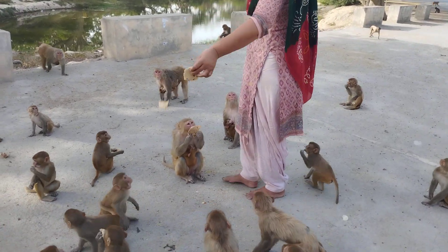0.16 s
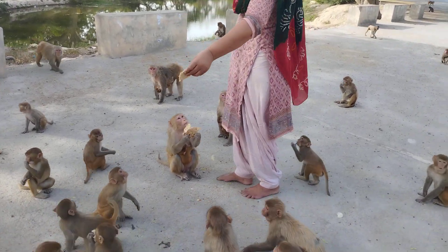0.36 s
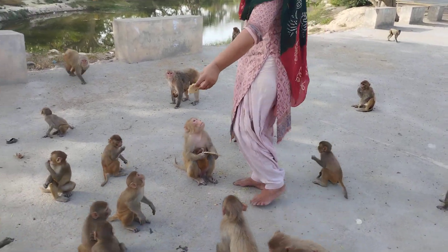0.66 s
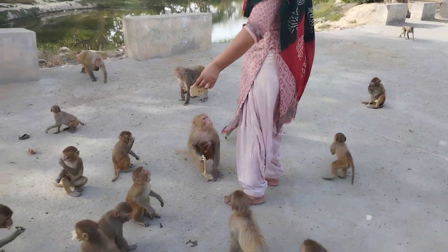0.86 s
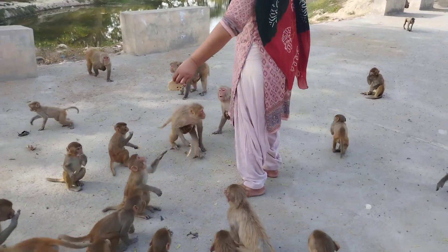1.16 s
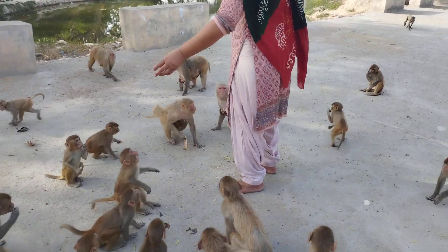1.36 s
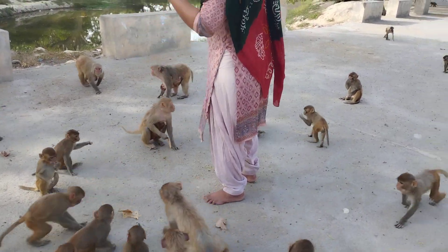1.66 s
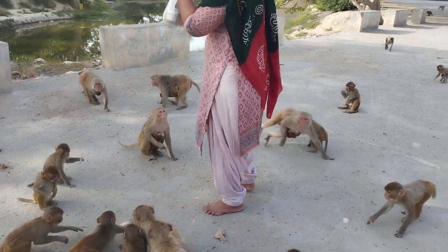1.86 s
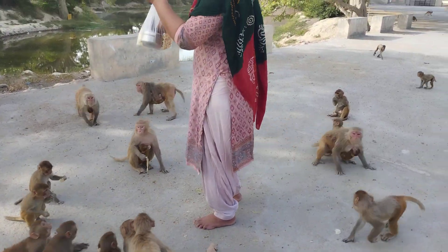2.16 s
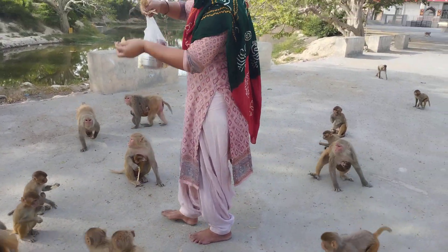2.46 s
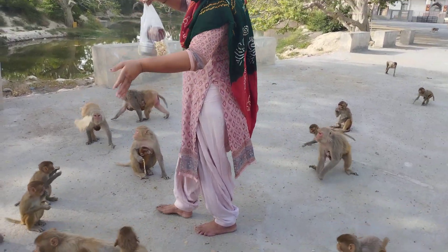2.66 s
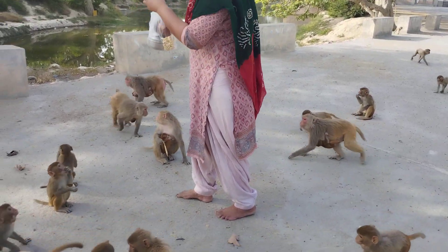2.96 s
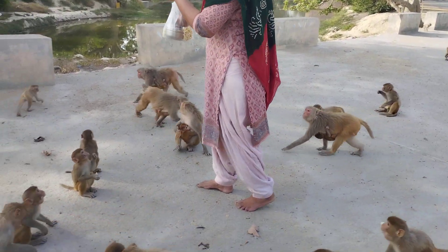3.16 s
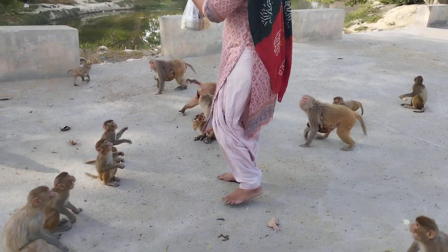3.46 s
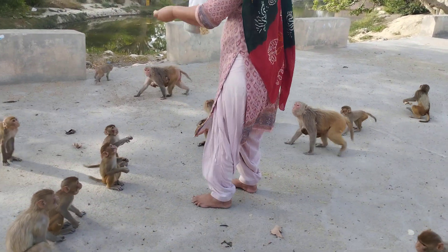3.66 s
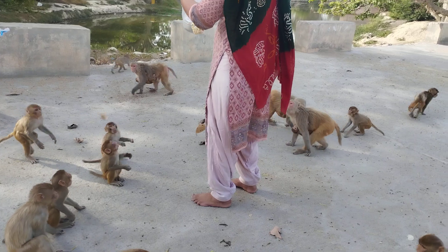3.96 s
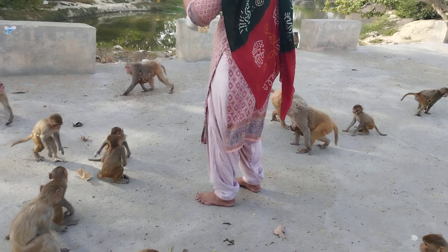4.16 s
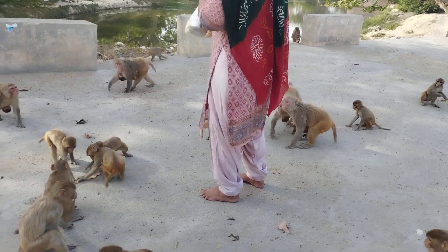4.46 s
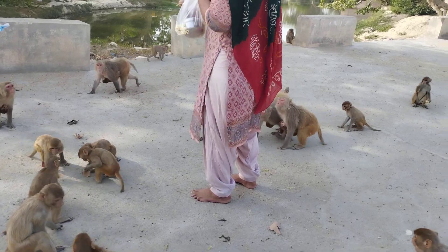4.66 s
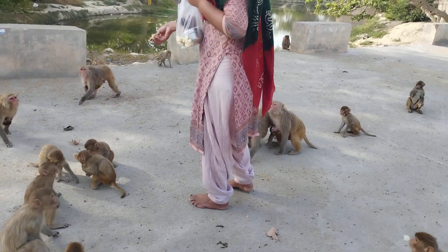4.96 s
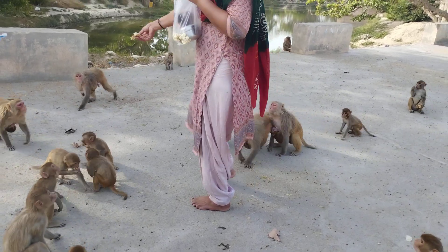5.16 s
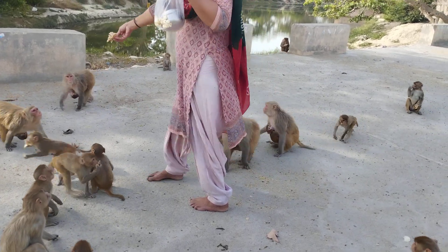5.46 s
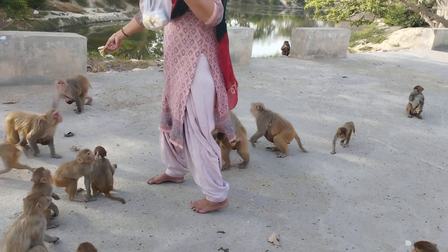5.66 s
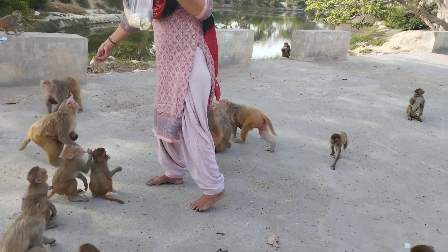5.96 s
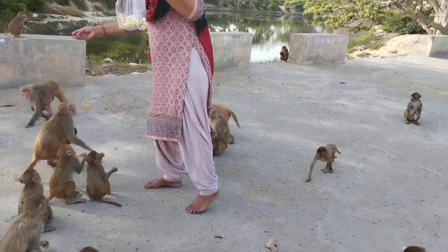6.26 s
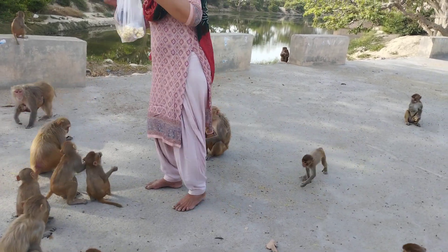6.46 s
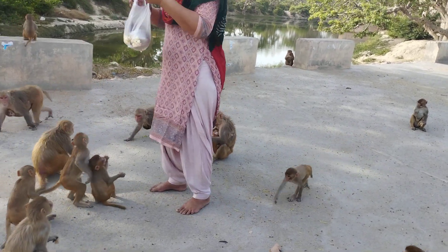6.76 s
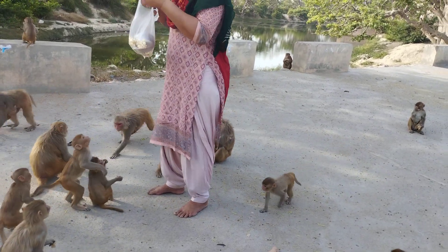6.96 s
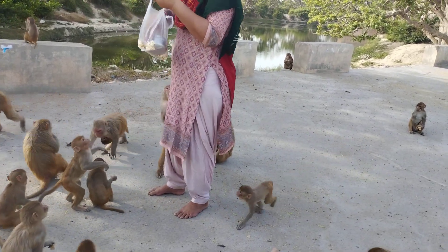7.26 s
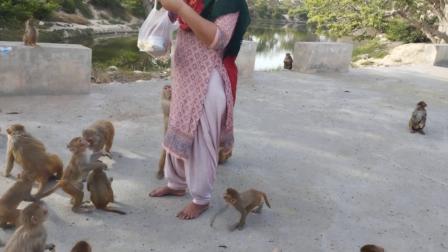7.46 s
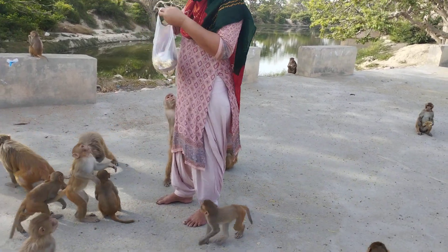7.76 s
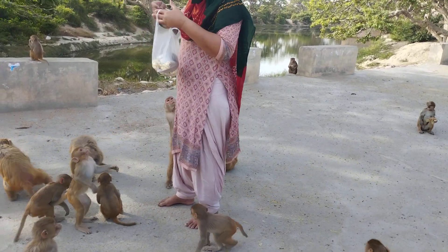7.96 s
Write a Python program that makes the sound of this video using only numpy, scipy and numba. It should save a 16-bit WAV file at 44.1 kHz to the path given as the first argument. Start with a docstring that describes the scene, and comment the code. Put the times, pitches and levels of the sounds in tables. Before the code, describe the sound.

Macaques coo softly and break into shrill, raspy squeals on an open yard while a thin plastic bag crackles close by.

```python
"""Macaques at feeding time

Macaques gather on a concrete yard by a pond to be fed: they coo on gliding stacks of harmonics and break
into shrill squeals roughened by bands of noise. A thin plastic bag crackles close by as filtered creases and
ringing snaps, lips and paws pop on short falling tones, and feet and bodies land as dull low thuds.
Far traffic, made of flickering noise bands, and one engine tone rumble under the open-air hiss."""
import sys
import numpy as np
from scipy import signal
from scipy.fft import rfft, irfft
from scipy.io import wavfile
from scipy.ndimage import uniform_filter1d
from numba import njit

SR = 44100
rng = np.random.default_rng(int(sys.argv[2]) if len(sys.argv) > 2 else 0)


def transcribe(u):
    """Save the signal u as a 16-bit wav file named by the first command-line argument.

    u: samples, shape (n,) or (channels, n), limited to [-1, 1]; the rate is SR.
    q: integer samples, one column per channel.
    """
    v = np.clip(np.atleast_2d(u).T, -1, 1)
    q = np.round(v * 32767).astype(np.int16)
    wavfile.write(sys.argv[1], SR, q)


N = 357210  # length in samples
TOP_HZ = 15900  # upper limit of the voices and of the whole mix


def undb(db):
    """Turn decibels into an amplitude factor."""
    return 10 ** (np.asarray(db) / 20)


def unit(x):
    """Scale to an RMS of 1."""
    return x / np.sqrt(np.mean(x ** 2))


def shape(table, hz):
    """Read the dB of a (Hz, dB) table on a log-frequency axis."""
    table_hz, db = np.transpose(table)
    return np.interp(np.log(np.maximum(hz, 1)), np.log(table_hz), db)


def colour(x, table):
    """Filter by a (Hz, dB) table."""
    gain = undb(shape(table, np.fft.rfftfreq(len(x), 1 / SR)))
    return irfft(rfft(x) * gain, len(x))


@njit
def svf(x, hz, q):
    """State-variable band-pass with a moving centre, gain 1 there."""
    y, band, low, damping = np.empty(len(x)), 0., 0., 1 / q
    for i in range(len(x)):
        g = np.tan(np.pi * hz[i] / SR)
        v = (band + g * (x[i] - low)) / (1 + g * (g + damping))
        band, low, y[i] = 2 * v - band, low + 2 * g * v, damping * v
    return y


def walk(n, rate):
    """Random levels held 1 / rate s and slewed twice; spread near 1."""
    hold = max(int(SR / rate), 1)
    steps = np.repeat(rng.standard_normal(n // hold + 1), hold)
    return 1.482 * uniform_filter1d(uniform_filter1d(steps, hold), hold)[:n]


def add(track, s, x):
    """Mix x into the track from time s."""
    i = int(s * SR)
    track[i:i + len(x)] += x[:N - i]


def envelope(table):
    """Follow a (s, dB) table as an amplitude over the whole scene."""
    return undb(np.interp(np.arange(N) / SR, *np.transpose(table)))


def bands(table, low_hz, octaves, flicker_db):
    """Half-octave bands of noise, each flickering alone, sum to an RMS of 1."""
    out = 0
    for hz in low_hz * 2 ** np.arange(0, octaves, .5):
        centre = np.full(N, hz)
        band = svf(svf(rng.standard_normal(N), centre, 2.56), centre, 2.56)
        out = out + band * undb(shape(table, hz) + flicker_db * walk(N, 9))
    return unit(out)


# Spectrum of the open-air hiss. Each row: frequency in Hz, relative density in dB per Hz.
AIR_SPECTRUM = [(300, -18), (700, -13), (1000, -20), (1800, -14), (3000, -29), (5000, -20.5), (8800, -20),
                (14800, -37), (16000, -37)]


def air():
    """Open-air hiss is broad noise whose bands flicker one by one."""
    return bands(AIR_SPECTRUM, low_hz=320, octaves=5.6, flicker_db=1.5) * undb(-61)


# Spectrum of the far traffic. Each row: frequency in Hz, relative density in dB per Hz.
TRAFFIC_SPECTRUM = [(12, -30), (20, 4.5), (64, 1), (100, -6), (145, -14), (209, -11), (330, -23.5),
                    (600, -38.5), (780, -52), (1320, -120)]
# Swell of the far traffic. Each row: time in seconds, level in dB.
TRAFFIC_LEVEL = [(0.0, -50), (3.2, -52), (3.9, -53.5), (5.0, -52), (6.31, -49.5), (6.56, -53.5), (8.1, -53)]


def traffic():
    """Distance leaves only the low rumble of the road."""
    return bands(TRAFFIC_SPECTRUM, low_hz=24, octaves=4.6, flicker_db=1.5) * envelope(TRAFFIC_LEVEL)


# A far engine pulling away. Each row: time in seconds, firing rate in Hz, level in dB.
ENGINE_PULL = [(1.1, 70.9, -61), (1.4, 73.1, -57), (1.8, 81.5, -55), (2.13, 88.7, -58.5), (2.6, 87, -56.5),
               (2.8, 85, -68)]


def engine():
    """The firing rate is heard as one low tone that wanders in pitch."""
    t = np.arange(N) / SR
    s, firing_hz, db = np.transpose(ENGINE_PULL)
    hz = np.interp(t, s, firing_hz) * (1 + .05 * walk(N, 24.8))
    level = undb(np.interp(t, s, db, left=-120, right=-120))
    return np.sqrt(2) * level * np.sin(2 * np.pi * np.cumsum(hz) / SR)


# Bare feet and bodies landing. Each row: start in seconds, level in dB, pitch in Hz.
LANDINGS = [(0.039, -39.5, 143), (1.51, -46, 271), (2.519, -39, 205), (2.549, -42.5, 274),
            (2.807, -48, 164), (3.439, -47, 256), (3.489, -52, 218), (3.59, -49.5, 232), (5.355, -51, 275)]


def thuds():
    """A soft push into the ground: a few dull cycles."""
    out, t = np.zeros(N), np.arange(4000) / SR
    push = t / 0.011 * np.exp(1 - t / 0.0078)
    for s, db, hz in LANDINGS:
        add(out, s, undb(db) * np.sin(2 * np.pi * hz * t) * push)
    return out


# Lip smacks and paw pats. Each row: start in seconds, level in dB, nominal pitch in Hz.
LIPS_AND_PAWS = [(0.385, -20.5, 854), (0.411, -44, 783), (0.497, -39, 1480), (0.56, -29.5, 880),
                 (0.58, -31.5, 960), (1.279, -33.5, 1690), (1.78, -40, 1600), (2.393, -31, 1875),
                 (2.646, -33, 1540), (2.659, -38, 883), (3.378, -37, 1100), (3.442, -37.5, 1600),
                 (3.504, -41, 1030), (3.713, -46, 1770), (3.837, -44, 1830), (4.019, -39.5, 1180),
                 (4.164, -37, 2260), (5.494, -40, 1710), (5.618, -43, 920), (6.616, -34.5, 1140),
                 (7.755, -39, 1940), (7.765, -31.5, 1960)]


def pops():
    """A small cavity drops in pitch as it opens: a few cycles that slide down and die."""
    out, t = np.zeros(N), np.arange(900) / SR
    slide = 0.863 + 0.93 * np.exp(-t / 0.00066)  # multiples of the nominal pitch
    fade = np.exp(-t / 0.0022) * np.minimum(t / 0.000047, 1)
    for s, db, hz in LIPS_AND_PAWS:
        add(out, s, undb(db) * np.sin(2 * np.pi * np.cumsum(hz * slide) / SR) * fade)
    return out


# Single creases and short scuffs. Each row: start in seconds, level in dB, centre in Hz,
# nominal length in ms (three times the rise).
CREASE_SNAPS = [(0.2256, -22.5, 8550, 13), (0.3826, -17, 8760, 3.4), (1.723, -21, 8350, 6.3),
                (1.8805, -19, 5260, 1.8), (1.8996, -16, 5330, 2.4), (1.9217, -19.5, 8600, 2.3),
                (2.395, -23.5, 8020, 3.0), (2.6329, -26, 10500, 2.7), (2.657, -20, 8000, 3.6),
                (2.826, -26, 8800, 4), (2.8704, -20, 10100, 5.7), (3.004, -17.5, 7500, 5.3),
                (3.2405, -24.5, 8800, 3.4), (3.2965, -32.5, 7560, 3.6), (3.441, -30, 8500, 3.2),
                (3.5882, -17.5, 7450, 5.9), (3.687, -15, 9600, 15), (3.7, -19, 13500, 7.9),
                (3.858, -27, 9100, 2.4), (4.0467, -28.5, 8900, 5.1), (4.147, -30, 11000, 3.0),
                (4.166, -13, 7650, 3.0), (4.181, -29, 3800, 3.5), (4.2236, -26, 10600, 5.7),
                (4.2734, -25, 6100, 6.1), (4.464, -37, 7500, 2.9), (4.726, -27, 10500, 2.8),
                (4.806, -28, 8130, 4.6), (5.027, -28, 7450, 3.3), (5.0615, -25.5, 9050, 2.5),
                (5.3842, -30.5, 7700, 4.1), (5.799, -25, 5000, 8.5), (6.2743, -24, 10000, 3.3),
                (6.5156, -27, 6840, 3.0), (6.5273, -23, 8200, 5.3), (6.6169, -23, 8600, 2.6),
                (6.6485, -18.5, 6860, 6.1), (6.6859, -29, 6900, 3.0), (6.8663, -20.5, 7330, 4.6),
                (7.1415, -29, 11400, 5), (7.154, -29, 11500, 3.0), (7.2913, -21, 7140, 8.8),
                (7.3174, -19, 10500, 4.8), (7.677, -18.5, 7200, 3.9), (7.7505, -18, 4650, 3.0),
                (7.77, -10, 7400, 4.2), (7.7815, -17, 7400, 3.1), (7.9348, -24, 8860, 3.6)]


def snaps():
    """A crease lets go at once: a clean ring, then grit that swells and dies round the same centre."""
    out, t = np.zeros(N), np.arange(2600) / SR
    for s, db, hz, ms in CREASE_SNAPS:
        grit = rng.standard_normal(len(t))
        u = t / (max(ms, .2) / 3000)
        ring = svf(grit, np.full(len(t), 1. * hz), 3.4) + 0.098 * np.diff(grit, prepend=0)
        crack = np.sin(2 * np.pi * hz * t) * np.exp(-t / .0005)
        add(out, s, undb(db) * (0.18 * unit(ring) * u * np.exp(1 - u) + .5 * crack))
    return out


# Steady rustle of the bag. Each row: time in seconds, level in dB.
BAG_RUSTLE = [(0.0, -37.5), (0.34, -51.5), (1.0, -46.5), (1.5, -47.5), (1.72, -48), (2.0, -50),
              (2.7, -52.5), (3.0, -51.5), (3.3, -50), (3.95, -55), (4.2, -46.5), (4.65, -49), (5.25, -57),
              (5.6, -50.5), (6.1, -40.5), (6.28, -56), (6.85, -41.5), (7.14, -57.5), (7.4, -47), (7.9, -60),
              (8.1, -51)]
# Single crumples of the bag. Each row: loudest moment in seconds, level in dB, half length in ms.
BAG_CRUMPLES = [(.58, -44, 23), (1.26, -36.5, 44), (1.62, -42.5, 120), (1.87, -68, 49), (2.041, -41.5, 120),
                (2.321, -39.5, 57), (2.46, -46.5, 49), (2.53, -46.5, 90), (2.66, -41, 16), (2.82, -49, 28),
                (2.96, -42, 99), (3.074, -35, 14), (3.37, -42.5, 16), (3.45, -48.5, 140),
                (3.712, -40.5, 52), (3.881, -42, 13), (4.17, -56, 17), (4.23, -42, 20), (4.277, -36.5, 15),
                (4.51, -41.5, 20), (4.601, -41.5, 105), (5.38, -48.5, 47), (5.86, -45, 65),
                (6.342, -40, 120), (6.67, -41.5, 21), (6.749, -39.5, 30), (6.898, -40, 67),
                (7.24, -43.5, 40), (7.297, -35.5, 33), (7.327, -33, 31), (7.44, -66, 50),
                (7.77, -41.5, 225)]
# Colour of the thin plastic. Each row: frequency in Hz, relative density in dB per Hz.
BAG_COLOUR = [(300, -13.5), (700, -6.5), (1600, -7), (2900, -9.5), (4500, -5.5), (7400, 1.5), (10400, 0),
              (14200, -11.5), (16000, -16)]
CRUMPLE_DB_PER_HALF = 12  # fall over each half length either side of the loudest moment


def bag():
    """Thousands of tiny creases a second, in flurries, with a few larger ones."""
    t = np.arange(N) / SR
    power = envelope(BAG_RUSTLE) ** 2
    for s, db, ms in BAG_CRUMPLES:
        power = power + undb(db - CRUMPLE_DB_PER_HALF * np.abs(t - s) * 1000 / ms) ** 2
    size_db = 2.2 * np.minimum(rng.exponential(size=N), 4)
    struck = rng.random(N) < 9000 / SR  # 9000 creases a second on average
    creases = undb(size_db) * struck * rng.standard_normal(N)
    flurry_db = 1.8 * walk(N, 120) + .8 * walk(N, 30)
    return unit(colour(creases * undb(flurry_db), BAG_COLOUR)) * np.sqrt(power)


# Throat colour of the rasp, and of the harmonics from the third up where no mouth shape is given.
# Each row: frequency in Hz, gain in dB.
THROAT_COLOUR = [(1500, 2.5), (2500, -2), (3200, 1.5), (4300, -3), (5200, 6.5), (6600, -6.5), (8300, -3),
                 (10500, -10), (12500, -9), (16000, -11)]


def overtones(hz, phase, level_db, mouth):
    """Harmonics from the third up take the colour of the mouth or throat."""
    n, out = len(hz), 0
    last = 2 + len(mouth) if mouth else int(TOP_HZ / hz.min())
    for k in range(3, last + 1):
        if mouth:
            tint_db = mouth[k - 3]
        else:  # these tones die away above 11 kHz, where the rasp carries on
            tint_db = shape(THROAT_COLOUR, k * hz) - 4.5 * np.maximum(k * hz / 1000 - 11, 0)
        # each overtone swells and fades a little by itself as the mouth moves
        db = level_db + tint_db + 2.5 * walk(n, 14)
        out = out + (k * hz < TOP_HZ) * undb(db) * np.sin(k * phase + k * k)
    return out


def rasp(hz, phase, rasp_at):
    """Chaotic folds add noise round a multiple of the pitch and its double, and a line between harmonics."""
    n = len(hz)
    grit = rng.standard_normal(n) * undb(2.2 * walk(n, 500) + 1.2 * walk(n, 110))
    low_hz, high_hz = rasp_at * hz, np.minimum(2 * rasp_at * hz, TOP_HZ)
    low = svf(svf(grit, low_hz, 1.5), low_hz, 1.5)
    high = svf(svf(grit, high_hz, 1.5), high_hz, 1.5)
    # strong and weak cycles alternate: a smeared line halfway between two harmonics
    half = walk(n, 400) * np.sin((max(int(rasp_at), 1) + .5) * phase)
    return unit(colour(low + undb(-9) * high, THROAT_COLOUR)) + .5 * half


def call(rows, jitter, shimmer_db, mouth=None, rasp_at=None):
    """Vocal folds give a stack of harmonics on the gliding pitch; chaotic vibration adds a rasp."""
    s, *columns = np.transpose(rows)
    n = int((s[-1] - s[0]) * SR)
    t = s[0] + np.arange(n) / SR
    # muscles cannot turn a corner at once
    hz, first_db, second_db, *upper = (uniform_filter1d(np.interp(t, s, c), size=265) for c in columns)
    wobble = jitter * walk(n, 250)
    if rasp_at:
        # the more rasp against tone, the more the cycles lose step and the lines smear
        tone_db = np.maximum(first_db, np.maximum(second_db, upper[0]))
        chaos = np.minimum(undb(upper[1] - tone_db), 1.5)
        wobble = wobble + .013 * chaos ** 2 * walk(n, 700)
    phase = 2 * np.pi * np.cumsum(hz * (1 + wobble)) / SR
    voice = undb(first_db) * np.sin(phase) + undb(second_db) * np.sin(2 * phase)
    if upper:
        voice = voice + overtones(hz, phase, upper[0], mouth)
    else:
        voice = voice + undb(second_db - 11.5) * np.sin(3 * phase) * (3 * hz < TOP_HZ)
    voice = np.sqrt(2) * voice * undb(shimmer_db * walk(n, 117.2))
    if rasp_at:
        voice = voice + undb(upper[1]) * rasp(hz, phase, rasp_at)
    # short fades, except where a call runs over the edge of the scene
    rise = np.arange(n) + (s[0] <= 0) * n
    fall = np.arange(n)[::-1] + (s[-1] * SR >= N - 1) * n
    return voice * np.minimum(np.minimum(rise, fall) / (0.0024 * SR), 1)


ONSET_DB, ENDING_DB = -7.5, -14.5  # ends of a short cry under its loudest moment


def cry(row, *layers_db):
    """A short cry swells to its loudest moment and fades."""
    level = row[6] + np.array([ONSET_DB, 0, ENDING_DB])
    return np.transpose([row[:3], row[3:6], level] + [level + db for db in layers_db])


# Thin whistles and far cries. Each row: start, loudest moment and end in seconds,
# pitch at these three in Hz, level in dB.
THIN_WHISTLES = [(1.309, 1.352, 1.352, 5740, 5600, 5300, -36), (3.36, 3.408, 3.44, 4240, 3930, 3750, -58),
                 (3.732, 3.8, 3.83, 2090, 2130, 2120, -66), (3.797, 3.972, 4.15, 5900, 5400, 5500, -60),
                 (3.886, 3.953, 4.0, 4200, 3930, 3177, -66), (4.454, 4.47, 4.5, 3320, 3070, 3280, -41),
                 (4.497, 4.52, 4.56, 657, 740, 763, -58), (4.82, 4.855, 4.91, 4900, 3900, 3370, -63),
                 (5.126, 5.173, 5.25, 4850, 3900, 3000, -64), (5.394, 5.4, 5.411, 1200, 1150, 1100, -50),
                 (5.434, 5.441, 5.455, 1067, 1170, 1067, -47), (5.777, 5.82, 5.93, 1104, 1366, 1870, -46.5),
                 (6.305, 6.34, 6.36, 1450, 1480, 1480, -52), (6.42, 6.45, 6.475, 1500, 1490, 1480, -51),
                 (6.815, 6.866, 6.9, 680, 694, 645, -49.5), (7.057, 7.1, 7.15, 4700, 4400, 3300, -65),
                 (7.097, 7.15, 7.2, 5330, 5370, 4480, -56), (7.235, 7.346, 7.345, 685, 705, 687, -53),
                 (7.916, 7.943, 7.995, 1098, 975, 950, -45.5),
                 (7.97, 7.998, 8.035, 2530, 2570, 2550, -77.5), (8.063, 8.094, 8.1, 2330, 2385, 2400, -57)]


def whistles(out):
    """Thin cries carry little above the fundamental."""
    for row in THIN_WHISTLES:
        add(out, row[0], call(cry(row, -12), jitter=.008, shimmer_db=2.5))  # second harmonic 12 dB down


# A warble with two upward flips. Each row: time in seconds, pitch in Hz, level in dB,
# brightness in dB over that level.
WARBLE_GLIDE = [(6.234, 1182, -70, -20), (6.304, 1454, -41.5, -27), (6.315, 2000, -60, -15),
                (6.335, 2152, -60, -12), (6.35, 1768, -41, -18), (6.365, 1488, -31.5, -24),
                (6.389, 1432, -35, -21), (6.42, 1516, -39, -17), (6.432, 1829, -50, -16),
                (6.455, 1842, -50.5, -18), (6.468, 1485, -38, -24), (6.5, 1250, -52.5, -17),
                (6.57, 1238, -53, -8), (6.62, 1120, -45.5, -16), (6.674, 970, -41.5, -18)]
# Mouth shape of the warble: gain of harmonics 3 to 7 in dB.
WARBLE_VOWEL = (-2, -5, 0, -6, -12)


def warble(out):
    """One voice flips up in pitch and back, its overtones following the brightness."""
    rows = [(s, hz, db, db + bright - 3.5, db + bright) for s, hz, db, bright in WARBLE_GLIDE]
    add(out, rows[0][0], call(rows, jitter=.008, shimmer_db=1.5, mouth=WARBLE_VOWEL))


# Short rough yelps and grunts. Each row: start, loudest moment and end in seconds, pitch at these three in Hz,
# level in dB, second harmonic, overtones and rasp in dB over that level, centre of the rasp in multiples
# of the pitch.
ROUGH_YELPS = [(0.62, 0.662, .667, 1102, 1464, 1490, -36.5, -20, -35, -20, 1.5),
               (4.605, 4.615, 4.626, 3270, 3270, 3240, -37, -7, -10, -3, 1.17),
               (1.445, 1.452, 1.472, 849, 846, 820, -37, -2.5, -23, -6.5, 1.14),
               (2.454, 2.471, 2.474, 907, 893, 1180, -34, -7, -8, -8, 1.3),
               (2.47, 2.478, 2.49, 1366, 1390, 1420, -35.5, -25, -22, -4, 1.3),
               (2.511, 2.518, 2.53, 1130, 1130, 1157, -44, -9, -20, 5, 1.13),
               (2.534, 2.549, 2.59, 1142, 1089, 645, -39, -20, -28, -5, 0.92),
               (3.045, 3.075, 3.1, 7000, 4880, 2070, -42, -24, -25, 0.5, 1.3),
               (5.32, 5.341, 5.35, 1263, 807, 850, -54.5, -18, -25, -1, 1.3),
               (7.312, 7.324, 7.34, 1553, 1396, 1240, -42, -20, -8, -5, 1.34),
               (7.594, 7.603, 7.624, 1424, 1350, 880, -37.5, -14.5, -28, -3.5, 1.04)]


def yelps(out):
    """Brief cries roughened by a rasp."""
    for row in ROUGH_YELPS:
        rows = cry(row, *row[7:10])
        add(out, row[0], call(rows, jitter=0.0082, shimmer_db=2.0, rasp_at=row[10]))


# Glides of the coos, one row an arch of a coo; the sixth and seventh are one coo with two arches.
# Each row: start, top and end in seconds, pitch at these three in Hz, scoop in %,
# final drop in %, second harmonic in dB, overtones in dB (both over the fundamental), dulling of the
# second harmonic and of the overtones in dB per octave below the top.
COO_GLIDES = [(-.08, 0.102, .256, 1075, 1084, 1060, 8.5, 31, -10.5, -16, 5, 5),
              (.948, 1.161, 1.238, 967, 1101, 1052, 14, 7.5, -16.5, -9.5, -42, 31),
              (1.495, 1.63, 1.682, 827, 935, 934, 9.1, 10.6, -23.5, -21, 1, 22),
              (2.754, 2.973, 3.097, 819, 989, 1011, 9.5, 23.4, -2.5, -22.5, 58, 20),
              (5.572, 5.8, 6.062, 905, 1034, 962, 11.9, 9, -13, -18, 10, 25),
              (5.811, 6.042, 6.08, 816, 914, 916, 17, 4.6, -11, -16.5, 86, 78),
              (6.084, 6.185, 6.27, 948, 981, 963, 8.1, 15.5, -12, -20.5, -24, -37),
              (7.775, 7.982, 8.2, 787, 858, 815, 5.8, 8, -16, -12, 42, 44)]
# Breath behind the coos, one list an arch of a coo; the sixth and seventh are one coo with two arches.
# Each row: time in seconds, level of the fundamental in dB.
COO_BREATHS = [
    [(0.0, -28.5), (.04, -25), (.15, -28.5), (.232, -34.5), (.256, -54)],
    [(.948, -46.5), (.98, -48.5), (1.05, -37), (1.11, -33.5), (1.164, -40.5), (1.216, -37.5), (1.238, -55)],
    [(1.495, -49), (1.51, -39.5), (1.546, -33.5), (1.616, -30.5), (1.662, -32.5), (1.682, -45)],
    [(2.755, -51.5), (2.8, -42), (2.854, -39.5), (2.92, -42), (2.955, -35), (3.058, -37), (3.097, -45)],
    [(5.575, -52), (5.62, -47), (5.7, -42.5), (5.754, -42.5), (5.79, -32.5), (5.89, -34.5), (5.98, -38.5),
     (6.045, -34), (6.062, -37)],
    [(5.81, -50), (5.84, -52), (5.88, -43.5), (5.94, -33.5), (6.0, -41), (6.08, -38)],
    [(6.08, -42), (6.16, -32), (6.21, -34), (6.25, -38.5), (6.27, -52)],
    [(7.775, -51), (7.81, -50.5), (7.92, -45.5), (7.97, -53), (8.1, -53.5)],
]
# Mouth shapes, one row an arch of a coo; the sixth and seventh are one coo with two arches.
# Each row: gain of harmonics 3 to 12 in dB.
COO_MOUTHS = [(-3.5, -14, -4, -2, -13, -0.5, 2, -20, -20, -26),
              (-7.5, 3.5, -7, -9, -6, -7.5, -22, -29, -26, -34), (-16, -8, -2, -7, -13, 0, 8, 1, -15, 6),
              (-2.5, 0, 7, -16, -20, -18, 5, 0, 3, -12), (-2.5, -7, 3, -13, -6, -0.5, -6, 1, -16, -24),
              (4, 10, 6, 5, -24, -6, -13, 6, -6, -9), (-4, 5, 2, -11, -24, -17, -12, -2, 4.5, -11),
              (-2, -29, -20, -22, -2, -18, -24, 6.5, -19, -21)]
SCOOP_S, DROP_S = .045, .021  # the pitch slides up into an arch and falls off its end


def coo_arch(breath, start, top, end, start_hz, top_hz, end_hz, scoop, drop, second_db, upper_db, *dulling):
    """An arch of pitch; the slacker the folds, the more the tone changes by the dulling."""
    s = np.linspace(max(start, 0), min(end, N / SR), 48)
    arch = np.interp(s, (start, top, end), (start_hz, top_hz, end_hz))
    arch = uniform_filter1d(arch, size=9, mode="nearest")
    slide_up = scoop / 100 * np.exp((start - s) / SCOOP_S)
    fall_off = drop / 100 * np.exp((s - end) / DROP_S)
    hz = arch * (1 - slide_up - fall_off)
    level = np.interp(s, *np.transpose(breath))
    slack = np.log2(hz.max() / hz)  # octaves below the top
    upper = [level + db - dull * slack for db, dull in zip((second_db, upper_db), dulling)]
    return np.transpose([s, hz, level] + upper)


def coos(out):
    """Steady folds sing clean gliding harmonics, each arch through its own mouth shape."""
    for row, breath, mouth in zip(COO_GLIDES, COO_BREATHS, COO_MOUTHS):
        add(out, max(row[0], 0), call(coo_arch(breath, *row), jitter=0.0013, shimmer_db=1.24, mouth=mouth))


# Glides of the squeals, one list a squeal or part of a squeal; the third is the onset of the scream
# in the fourth. Each row: time in seconds, pitch in Hz, effort in dB, rasp in dB.
SQUEAL_GLIDES = [
    [(0.0, 1296, -33, -24), (0.035, 1288, -28.5, -29.5), (0.05, 1257, -39.5, -35), (0.075, 1290, -47, -38),
     (0.11, 1236, -49, -51)],
    [(0.474, 5400, -38, -59), (0.485, 5660, -27.5, -54), (0.505, 5940, -28.5, -48),
     (0.528, 6090, -23.5, -49), (0.55, 5280, -26, -38), (0.575, 4160, -30, -36), (0.6, 3654, -50, -58),
     (0.618, 2900, -48, -49)],
    [(0.668, 1970, -48, -58), (0.685, 2570, -56, -67), (0.7, 3200, -59, -70), (0.7145, 3700, -28, -58)],
    [(0.712, 3640, -28, -55), (0.722, 3900, -29.5, -44), (0.737, 5090, -20.5, -28),
     (0.75, 5570, -19.5, -27.5), (0.78, 6370, -19.5, -22.5), (0.81, 6500, -17, -21),
     (0.822, 6600, -15, -24.5), (0.835, 6500, -22.5, -24), (0.85, 6280, -13.5, -19),
     (0.868, 5530, -16, -21), (0.884, 4650, -19, -18), (0.897, 4230, -25, -20), (0.907, 3750, -27, -16.5)],
    [(0.905, 2970, -21, -20), (0.915, 2644, -21, -30), (0.932, 2590, -24, -34), (0.945, 2340, -33, -36),
     (0.968, 2220, -40, -63)],
    [(1.13, 4400, -39, -54), (1.18, 5740, -30.5, -54), (1.2, 5300, -31.5, -56), (1.225, 5560, -31, -52),
     (1.24, 5300, -41, -27)],
    [(1.215, 4779, -35, -62), (1.24, 4030, -28.5, -40.5), (1.265, 4210, -29.5, -33),
     (1.283, 4360, -28, -46), (1.3, 5010, -35, -32), (1.318, 4490, -30, -48), (1.345, 4430, -30.5, -46),
     (1.37, 4135, -29, -31), (1.385, 3415, -27, -29), (1.4, 3920, -29, -33), (1.43, 3591, -36, -43.5),
     (1.47, 3210, -34, -45)],
    [(2.258, 3770, -37, -68), (2.275, 3980, -36, -60), (2.292, 4060, -28.5, -54), (2.31, 3762, -28, -52),
     (2.325, 3535, -30.5, -33), (2.345, 2490, -58, -31.5), (2.375, 1935, -51, -48)],
    [(4.48, 2320, -55, -68), (4.51, 2130, -52, -60), (4.535, 1920, -48, -63), (4.57, 1963, -55, -55),
     (4.587, 1830, -54, -53), (4.597, 2000, -47, -44), (4.606, 1990, -41, -40)],
    [(5.9, 4812, -55, -58.5), (5.92, 3830, -29, -44), (5.945, 2700, -49, -35.5), (5.97, 2000, -48.5, -40),
     (6.01, 1926, -44, -55)],
]
# Voices, one row a squeal or part of a squeal, in the order of the glides. Each row: fundamental,
# second harmonic and overtones in dB over the effort, centre of the rasp in multiples of the pitch.
SQUEAL_VOICES = [(-40, -2, 0.5, 4.1), (-0.5, -15, -28, 1.53), (1, -12, 5, 1.59), (0, -4, -19, 1.59),
                 (-1, 1.5, -21, 1.5), (0.5, -35, -30, 1.07), (-0.5, -21, -32, .95), (1, -19.5, -18, 1.18),
                 (-8, 7.5, 1, 2.1), (-5.5, -16, -20, 1.25)]
# Open mouth of a squeal on its two lowest harmonics. Each row: frequency in Hz, gain in dB.
OPEN_MOUTH = [(2000, 6.5), (2600, -2.5), (4100, -7), (5300, 2.5), (6600, -10), (8000, 10), (11000, 0.5),
              (13500, -6)]


def squeal(rows, first_db, second_db, upper_db):
    """Effort drives all harmonics; the open mouth colours the lowest two."""
    s, hz, effort, rasp_db = np.transpose(rows)
    first = effort + first_db + shape(OPEN_MOUTH, hz)
    second = effort + second_db + shape(OPEN_MOUTH, 2 * hz)
    return np.transpose([s, hz, first, second, effort + upper_db, rasp_db])


def squeals(out):
    """Strained folds shriek high and turn raspy as chaos takes over."""
    for glide, (*levels_db, rasp_at) in zip(SQUEAL_GLIDES, SQUEAL_VOICES):
        rows = squeal(glide, *levels_db)
        add(out, rows[0][0], call(rows, jitter=0.0082, shimmer_db=2.0, rasp_at=rasp_at))


# Ground and wall echoes of the yard. Each row: delay in ms, level in dB.
YARD_ECHOES = [(4.1, -24.5), (11.0, -26.5), (27.0, -24.5), (55.0, -28)]


def yard(x):
    """Ground and walls return a few faint delayed copies."""
    out = x
    for ms, db in YARD_ECHOES:
        delay = ms * SR / 1000
        out = out + undb(db) * np.roll(x, int(delay)) * (np.arange(N) > delay)
    return out


def monkeys():
    """Every whistle, warble, yelp, coo and squeal sounds in the echoing yard."""
    out = np.zeros(N)
    for voices in (whistles, warble, yelps, coos, squeals):
        voices(out)
    return yard(out)


def scene():
    """Mix the background, the bag and the monkeys to one channel."""
    return (air() + traffic() + engine() + thuds() + pops() + snaps() + bag() + monkeys())[None]


# Response of the phone's sound port. Each row: frequency in Hz, gain in dB.
PORT_RESPONSE = [(2300, 0.5), (3200, -3.5), (4300, 1), (5400, -3), (6300, -4), (7300, -3), (11000, -4),
                 (12300, -4), (13800, 0)]


def record(dry):
    """The phone's port dents the treble and the top is cut."""
    top_cut = signal.ellip(10, .2, 70, TOP_HZ, fs=SR, output="sos")
    return signal.sosfilt(top_cut, colour(dry[0], PORT_RESPONSE))[None]


dry = scene()
out = record(dry)
transcribe(out)
```